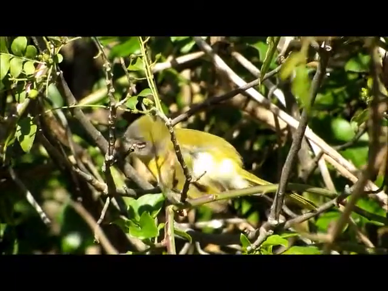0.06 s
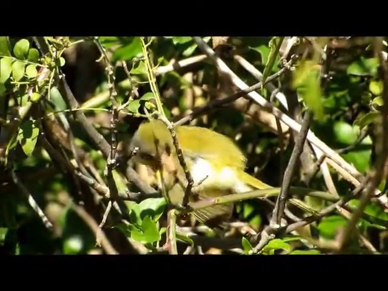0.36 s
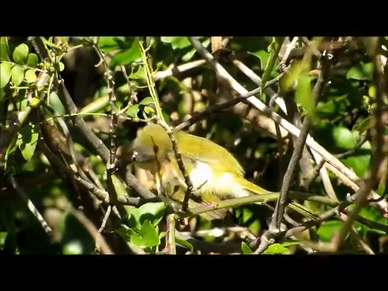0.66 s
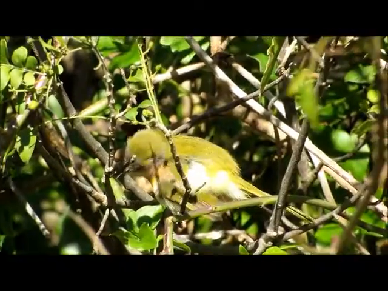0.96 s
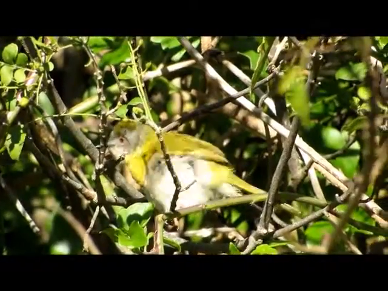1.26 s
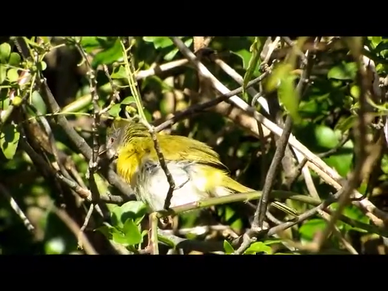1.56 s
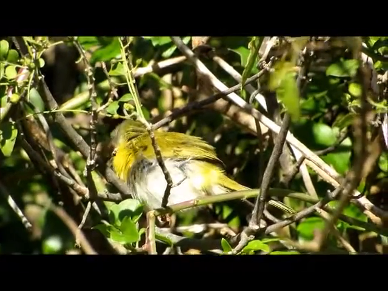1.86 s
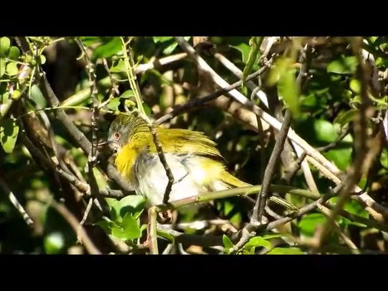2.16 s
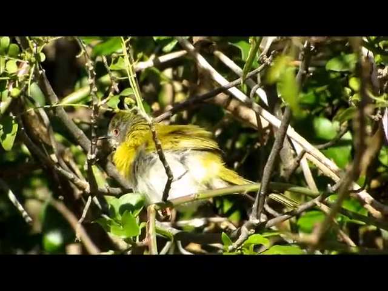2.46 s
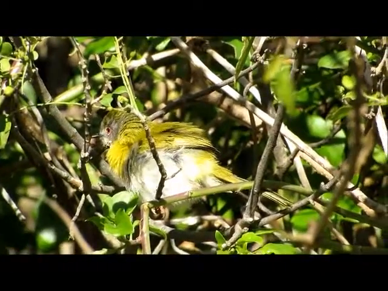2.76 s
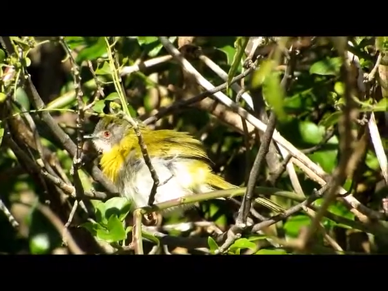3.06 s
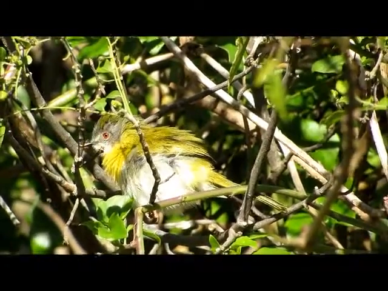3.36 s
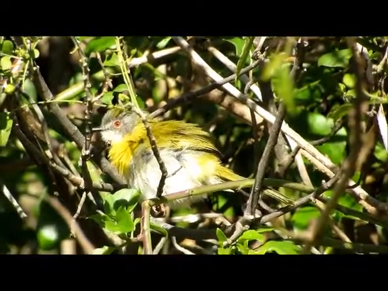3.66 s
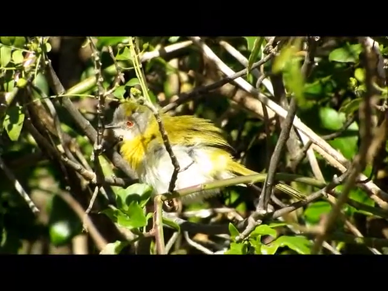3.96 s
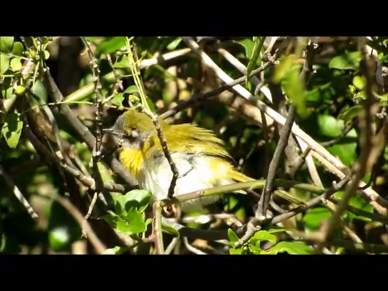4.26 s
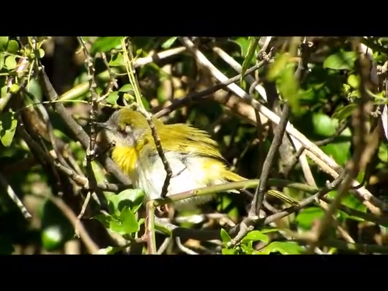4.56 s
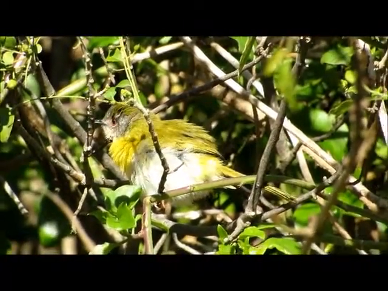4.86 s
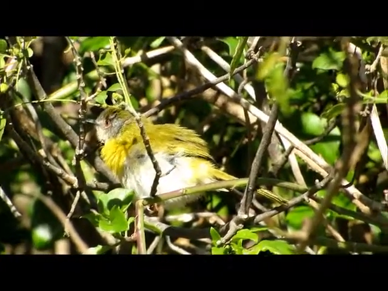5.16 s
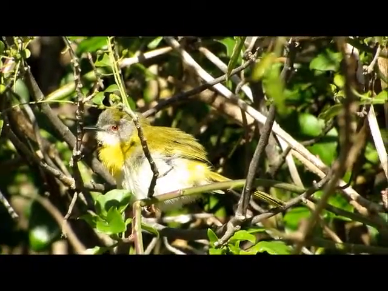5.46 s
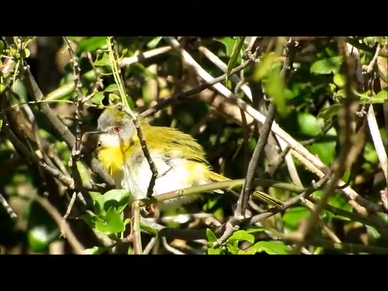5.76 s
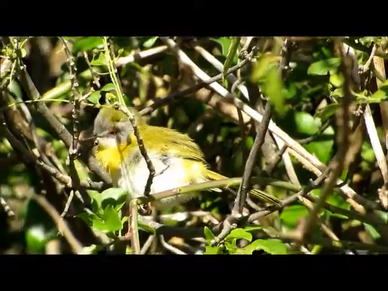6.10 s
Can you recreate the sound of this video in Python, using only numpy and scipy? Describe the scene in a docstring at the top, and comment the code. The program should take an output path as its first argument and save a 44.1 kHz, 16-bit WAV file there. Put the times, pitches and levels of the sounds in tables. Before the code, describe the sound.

Harsh, buzzy calls and sharp chips from small birds overlap in a thicket, with thin whistles further off.

```python
"""Small birds scold in a thicket with hoarse, often overlapping rasps and short chips that rise and fall.
Both come from a bird's voice box (the syrinx), whose pulses ring its throat near 4 kHz.
Forced chips break into a higher voice, and thin whistles come from birds further off.
Twigs and leaves scatter the calls over a soft outdoor hiss; the microphone passes no bass."""
import sys
import numpy as np
from scipy import signal
from scipy.fft import rfft, irfft, next_fast_len
from scipy.io import wavfile
from scipy.ndimage import map_coordinates

SR = 44100
rng = np.random.default_rng(int(sys.argv[2]) if len(sys.argv) > 2 else 0)


def master_out(mix):
    """Clip the mix to full scale and print it as 16-bit PCM to the path in sys.argv[1]."""
    frames = np.transpose(np.atleast_2d(mix))
    ceiling = np.clip(frames, -1, 1)
    pcm = np.round(ceiling * 32767).astype(np.int16)
    wavfile.write(sys.argv[1], SR, pcm)


N = 270333


def gain(db):
    """Turn decibels into a number to multiply by."""
    return 10 ** (np.asarray(db) / 20)


def normalise(x):
    """Scale a sound to an average strength (rms) of 1."""
    return x / np.sqrt(np.mean(x ** 2))


def wander(rate, size):
    """Drift between random values, `rate` new ones a second."""
    at = np.arange(size) * rate / SR
    count = int(at[-1]) + 2
    return np.interp(at, np.arange(count), rng.standard_normal(count))


def colour(x, points):
    """Shape the tone with a curve of (Hz, dB) points."""
    hz, db = np.transpose(points)
    size = next_fast_len(x.shape[-1] + 512)
    bin_hz = np.maximum(np.arange(size // 2 + 1) * SR / size, 1)
    curve = gain(np.interp(np.log(bin_hz), np.log(hz), db))
    return irfft(rfft(x, size) * curve, size)[..., :x.shape[-1]]


def resonance(x, hz, width_hz):
    """Ring at one frequency; the narrower the width, the longer the ring."""
    return signal.lfilter(*signal.iirpeak(hz, hz / width_hz, fs=SR), x)


def add(out, start, x):
    """Mix a sound in at its start time in seconds."""
    i = int(start * SR)
    out[i:i + len(x)] += x[:len(out) - i]


# The tone of the hiss. Each row: frequency in Hz, relative level in dB.
HISS_TONE = [(290, -64), (500, -1.5), (927, -1.5), (1130, -3), (1240, -1.5), (1800, -2.5), (2100, -2.5),
             (2230, -1.5), (2460, -4), (5750, -5.5), (7240, -7.5), (9930, -9.5), (15500, -20)]


def outdoor_hiss(level_db=-53):
    """Soft noise from all around, barely swelling."""
    noise = rng.standard_normal((2, N)) + .26 * rng.standard_normal(N)  # the ears share a little
    hiss = colour(noise, HISS_TONE)
    return hiss / hiss.mean(axis=0).std() * gain(level_db + .5 * wander(.81, N))


def leaf_echoes(x, db, fade_s):
    """Leaves and branches send each ear its own dense echoes, which fall 60 dB in `fade_s`."""
    t = np.arange(int(.7 * SR)) / SR
    build_up = 1 - np.exp(-t / .0013)
    echoes = rng.standard_normal((2, len(t))) * np.exp(-np.log(1000) * t / fade_s) * build_up
    echoes /= np.sqrt(np.sum(echoes ** 2, axis=1, keepdims=True))
    return gain(db) * signal.fftconvolve(x[None], echoes, axes=1)[:, :N]


def direct_sound(x, lag_s=.000016, left_db=.4):
    """Sound coming straight from the birds arrives a little sooner and louder on the left."""
    late = map_coordinates(x, [np.arange(N) - lag_s * SR], order=3)
    return np.array([x * gain(left_db), late * gain(-left_db)])


def whistle(start, end, first_hz, last_hz, db):
    """A thin, gliding tone that quavers in pitch and flutters in loudness."""
    progress = np.linspace(0, 1, int((end - start) * SR))
    size = len(progress)
    quaver = 1 + .014 * wander(100, size) + .018 * wander(900, size)
    hz = (first_hz + (last_hz - first_hz) * progress) * quaver
    swell = np.sqrt(4 * progress * (1 - progress))
    flutter = gain(5.3 * wander(150, size))
    tone = np.sin(2 * np.pi * np.cumsum(hz) / SR)
    return normalise(swell * flutter * tone) * gain(db)


# One bird repeats a very high falling note. Each row: start in seconds, level in dB.
FALLING_NOTES = [(1.315, -55.5), (1.507, -54.5), (2.6, -52.5), (2.787, -53)]
# Other whistles. Each row: start and end in seconds, first and last pitch in Hz, level in dB.
GLIDES = [ (1.074, 1.264, 5760, 6870, -61), (1.747, 1.784, 6980, 8580, -53), (2.228, 2.37, 6050, 6040, -68),
          (2.396, 2.532, 6070, 7060, -57.5), (3.93, 3.982, 3362, 3160, -43.5),
          (4.009, 4.031, 3500, 2660, -46.5), (4.214, 4.262, 5940, 5160, -56.5),
          (4.245, 4.305, 4250, 2715, -46.5), (4.413, 4.551, 5410, 5100, -46)]


def distant_birds():
    """Birds further off whistle faint, thin notes."""
    out = np.zeros(N)
    for start, db in FALLING_NOTES:
        add(out, start, whistle(start, start + .066, first_hz=8850, last_hz=7690, db=db))
    for start, end, first_hz, last_hz, db in GLIDES:
        add(out, start, whistle(start, end, first_hz, last_hz, db))
    return out


def syrinx(hz, jitter, shimmer_db, strong_harmonic=1, boost=0):
    """The voice box makes sharp pulses, uneven in timing (jitter) and in strength (shimmer)."""
    uneven_hz = hz * np.exp(jitter * wander(900, len(hz)))
    phase = 2 * np.pi * np.cumsum(uneven_hz) / SR
    harmonics = np.arange(1, 13)[:, None]  # whole multiples of the pitch
    pulses = np.cos(harmonics * phase).sum(axis=0) + boost * np.cos(strong_harmonic * phase)
    return pulses * gain(shimmer_db * wander(500, len(hz)))


# How the beak colours a chip. Each row: frequency in Hz, boost or cut in dB.
CHIP_BEAK_TONE = [(700, -10), (1100, 2), (2100, 7), (2700, 2.5), (3250, 9), (4200, -3.5), (5700, -1.5),
                  (6300, -10), (8000, -12), (10000, -32), (14000, -60)]


def chip(start, peak, end, first_hz, peak_hz, last_hz, db, jitter, throat_hz=4130):
    """An arch of pitch, clear on top and creaky at the ends. Returns its start time and its sound."""
    lead_s, creak_s = .016, .0051  # a creak fades in ahead of the note
    t = start - lead_s + np.arange(int((end - start + lead_s + .04) * SR)) / SR
    from_peak = np.where(t < peak, (peak - t) / (peak - start), (t - peak) / (end - peak))
    foot_hz = np.where(t < peak, first_hz, last_hz)
    hz = peak_hz / (1 + (peak_hz / foot_hz - 1) * np.minimum(from_peak, 1.5) ** 1.6)
    effort = np.minimum(hz / peak_hz, 1)  # breath pressure sets pitch, loudness and steadiness
    # The chip flashes as its strong harmonic meets the throat's resonance.
    pulses = syrinx(hz, jitter + .2 * (1 - effort) ** 2, shimmer_db=1.5,
                    strong_harmonic=round(throat_hz / peak_hz), boost=2.33)
    turbulence = 50 * jitter * rng.standard_normal(len(t))
    release_s = 1.25 * (end - peak)  # a note cut off at its peak stops short
    fades = np.exp(-np.maximum(start - t, 0) / creak_s - np.maximum(t - end, 0) / release_s)
    ringing = resonance((pulses + turbulence) * effort ** 2 * fades, throat_hz, width_hz=430)
    voice = colour(ringing, CHIP_BEAK_TONE)
    strength = np.sqrt(np.sum(voice ** 2) / ((end - start) * SR))
    return t[0], voice * gain(db) / strength


# Plain chips. Each row: time of the peak in seconds, peak pitch in Hz, level in dB.
PLAIN_CHIPS = [(.998, 1036, -27.5), (1.416, 1048, -27.5), (2.615, 1052, -26), (3.078, 1071, -24.5),
               (3.633, 1087, -22.5), (4.116, 1115, -21.3)]
# Chips whose voice breaks. Each row: time of the break in seconds,
# length of the rise before it in seconds, level of that rise in dB.
FORCED_CHIPS = [(4.648, 0.032, -23), (5.041, 0.033, -22.5), (5.402, 0.034, -23), (5.792, 0.029, -23)]


def chipping_birds():
    """Plain chips make one arch; forced ones rise in the low voice, then fall in the high one."""
    out = np.zeros(N)
    for peak, hz, db in PLAIN_CHIPS:
        jitter = .058 * .5 ** ((db + 24.5) / 4)  # louder is clearer: 4 dB more halves the jitter
        add(out, *chip(peak - .016, peak, peak + .018, .9 * hz, hz, .69 * hz, db, jitter))
    gap_s, hold_s = .0034, .00728  # the low voice holds its top pitch, then stops just before the break
    for at, rise_s, db in FORCED_CHIPS:
        stop = at - gap_s
        add(out, *chip(at - rise_s, stop - hold_s, stop,
                       first_hz=808, peak_hz=1131, last_hz=1131, db=db, jitter=.013))
        add(out, *chip(at, at + .00256, at + .018,
                       first_hz=1443, peak_hz=1518, last_hz=940, db=db + 3, jitter=.025))
    return out


def undertone(size, jitter, pitch_hz=955):
    """Two steadier low harmonics under a rasp, stronger in the more even calls."""
    hz = pitch_hz * np.exp(.028 * wander(300, size))
    phase = 2 * np.pi * np.cumsum(hz) / SR
    tone = gain(-14) * np.sin(2 * phase) + gain(-11) * np.sin(3 * phase)
    return tone * np.exp(-jitter / .13)


def rasp_loudness(t, length, level_db, attack_s=.009, release_s=.0095):
    """A rasp swells, wavers as it grows a touch more, then dies away quickly."""
    swell_s = min(.028 * (length / .066) ** .22, length)  # longer rasps swell more slowly
    swell_db = np.interp(t, [0, swell_s, length], [-15, -.25, .25])
    waver_db = 1.1 * wander(40, len(t))
    fades = np.minimum(t / attack_s, 1) * np.exp(-np.maximum(t - length, 0) / release_s)
    return gain(level_db + swell_db + waver_db) * fades


# How the beak colours a rasp, before the upward slide. Each row: frequency in Hz, boost or cut in dB.
RASP_BEAK_TONE = [(700, -33), (1100, -2.5), (1700, -1), (2400, 0), (3200, -1.5), (4100, 5.5), (5200, 5),
                  (5800, 5), (6250, -8), (7000, -13), (8200, -11.5), (10000, -32.5), (14000, -51)]


def rasp(start, end, level_db, throat_hz, jitter, opening_s=.0135, creep_s=.074):
    """Chaotic pulses ring the throat; as the call swells, pitch and resonances slide up together."""
    length = end - start
    t = np.arange(int((length + .06) * SR)) / SR
    slack = np.exp(-t / opening_s)  # the voice box membranes start loose and the beak shut
    opened = 1 - slack
    pulse_hz = np.full(len(t), throat_hz / 5)  # the throat rings on the fifth harmonic
    pulses = syrinx(pulse_hz, jitter + .3 * slack, shimmer_db=1 + 6.5 * jitter)
    gape = max(throat_hz / 4540, .92) ** 4.3  # a wider beak rings both higher and broader
    width_hz = gape * (403 + 72 * start)  # the ring also broadens as the scolding heats up
    ringing = normalise(colour(resonance(pulses, throat_hz, width_hz), RASP_BEAK_TONE))
    scrape = normalise(colour(pulses, RASP_BEAK_TONE))  # heard before the throat rings
    voice = opened * ringing + .28 * slack * scrape
    scoop = 1 - .43 * slack  # the beak opens quickly
    creep = 1 + .1 * (np.minimum(t / creep_s, 1) - .85)  # and then a little further
    sliding = map_coordinates(voice, [np.cumsum(scoop * creep)], order=3)  # faster means higher
    low_tone = opened ** 2 * undertone(len(t), jitter)
    return (sliding + low_tone) * rasp_loudness(t, length, level_db)


# Hoarse rasps, short or drawn out. Each row: start and end in seconds, level in dB,
# throat resonance in Hz that the slide ends near, jitter from 0 (even) to 1 (very rough).
SCOLDING_RASPS = [ (0.045, 0.113, -23.5, 4530, 0.15), (0.211, .304, -25, 4486, 0.15),
                  (0.365, 0.425, -25.5, 4490, 0.25), (0.434, 0.506, -26, 4660, 0.12),
                  (0.992, 1.043, -26, 4533, 0.21), (1.599, 1.68, -26, 4490, 0.22),
                  (1.884, 1.958, -31, 4634, 0.16), (2.089, 2.438, -34.5, 4213, .15),
                  (2.262, 2.329, -27, 4460, 0.15), (2.674, 2.928, -31, 4534, 0.21),
                  (2.809, 2.882, -29.5, 4486, 0.2), (3.138, 3.787, -31.5, 4570, .22),
                  (3.259, 3.388, -31, 4510, 0.3), (3.834, 3.893, -25.5, 4536, 0.11),
                  (3.956, 4.114, -32.5, 4367, 0.14), (4.117, 4.149, -24.5, 4023, 0.04),
                  (4.339, 4.394, -26.5, 4377, 0.08), (4.369, 4.581, -31.3, 4477, 0.18),
                  (4.524, 4.595, -27, 4327, .17), (4.695, 4.759, -25.5, 4260, .08),
                  (4.724, 4.932, -28.5, 4310, .13), (4.984, 4.996, -30, 3850, 0.14),
                  (5.035, 5.085, -26.5, 4600, 0.07), (5.07, 5.136, -25, 4770, 0.08),
                  (5.2, 5.268, -25.5, 4356, 0.2), (5.233, 5.304, -26.5, 4840, 0.07),
                  (5.337, 5.406, -30.5, 4070, 0.04), (5.403, 5.472, -24.5, 4883, 0.09),
                  (5.541, 5.608, -28, 4540, 0.18), (5.588, 5.652, -26, 4953, 0.08),
                  (5.732, 5.816, -25.5, 4663, 0.15), (5.939, 6.001, -28.5, 4790, 0.11)]


def rasping_birds():
    """The scolding rasps overlap where two birds call at once."""
    out = np.zeros(N)
    for start, end, level_db, throat_hz, jitter in SCOLDING_RASPS:
        add(out, start, rasp(start, end, level_db, throat_hz, jitter))
    return out


def scene():
    """Near and far birds share one thicket; the chips have the least echo."""
    rasps, chips, whistles = rasping_birds(), chipping_birds(), distant_birds()
    near_calls = rasps + gain(-4) * chips
    twigs = leaf_echoes(near_calls + 2 * whistles, db=-5.5, fade_s=.048)
    trees = leaf_echoes(near_calls, db=-9, fade_s=.38) + leaf_echoes(whistles, db=-2, fade_s=.4)
    return direct_sound(rasps + chips + whistles) + twigs + trees + outdoor_hiss()


def record(dry):
    """The microphone steeply cuts the bass and the very highest treble."""
    low_hz, top_hz = 958, 15200
    bass_cut = signal.butter(8, low_hz, "high", fs=SR, output="sos")
    top_cut = signal.ellip(8, .2, 70, top_hz, fs=SR, output="sos")
    return signal.sosfilt(top_cut, signal.sosfilt(bass_cut, dry))


dry = scene()
out = record(dry)
master_out(out)
```